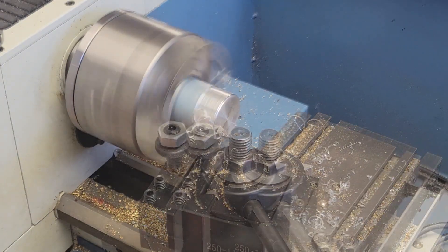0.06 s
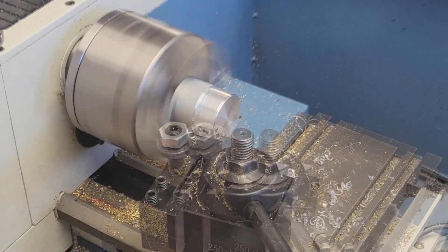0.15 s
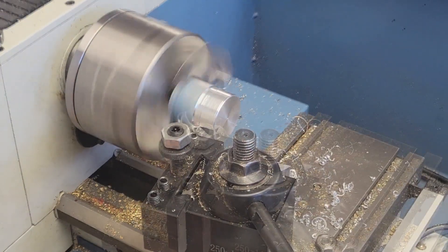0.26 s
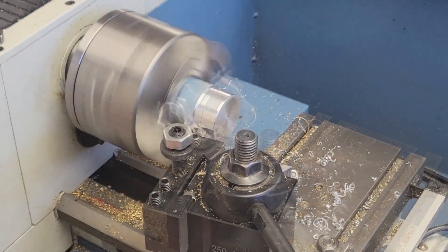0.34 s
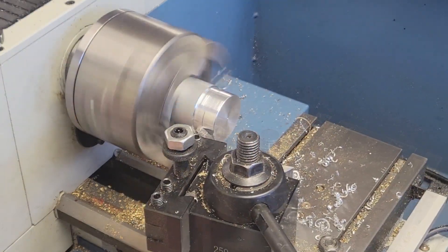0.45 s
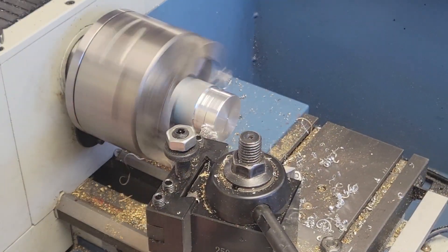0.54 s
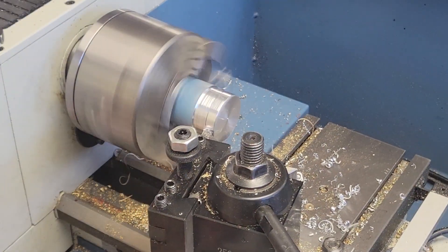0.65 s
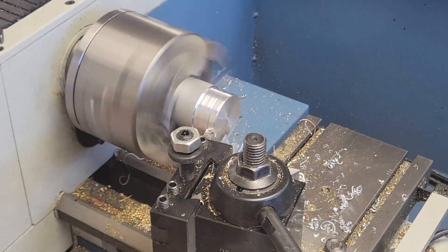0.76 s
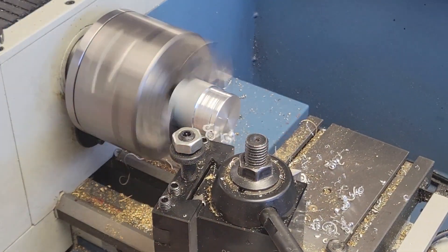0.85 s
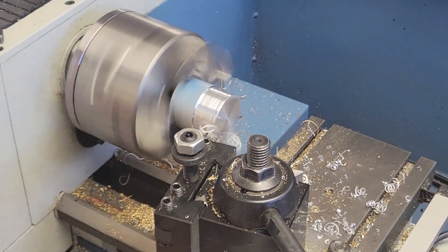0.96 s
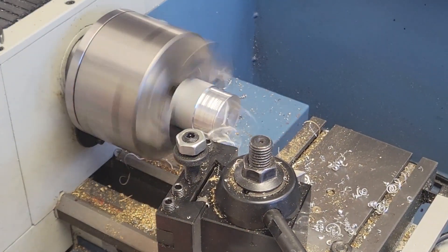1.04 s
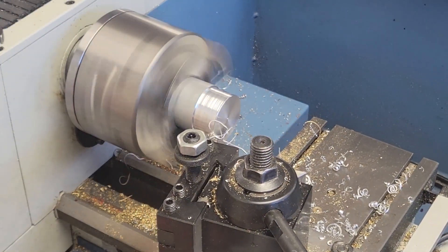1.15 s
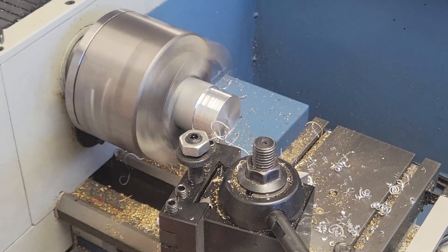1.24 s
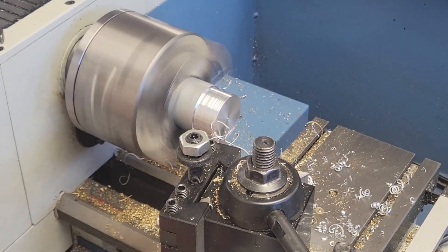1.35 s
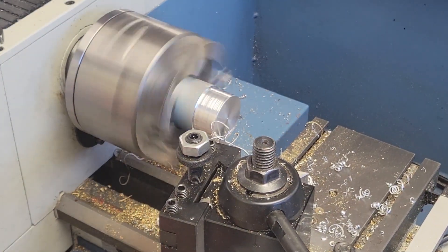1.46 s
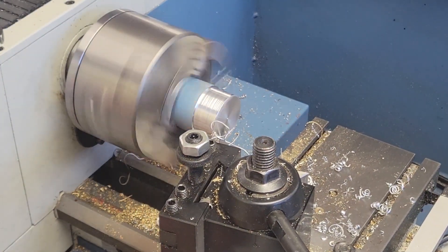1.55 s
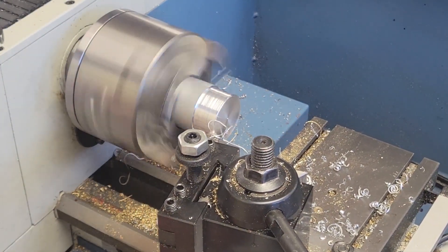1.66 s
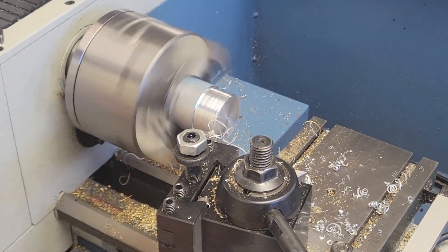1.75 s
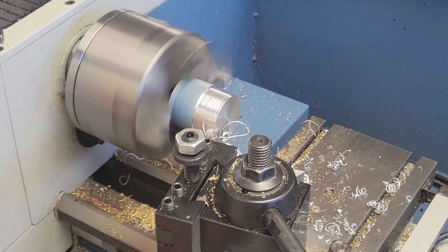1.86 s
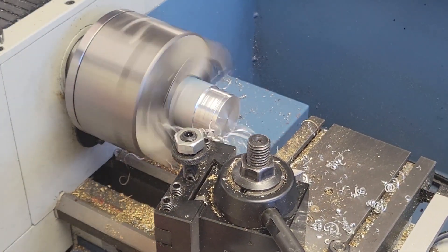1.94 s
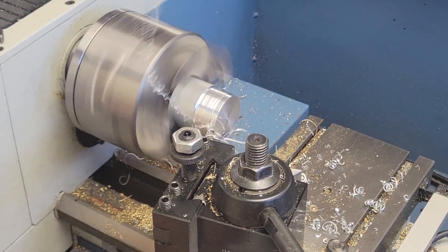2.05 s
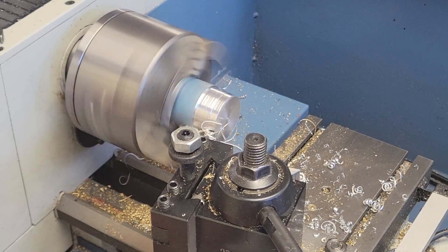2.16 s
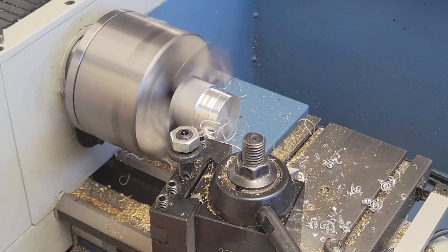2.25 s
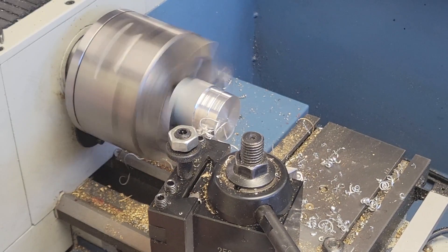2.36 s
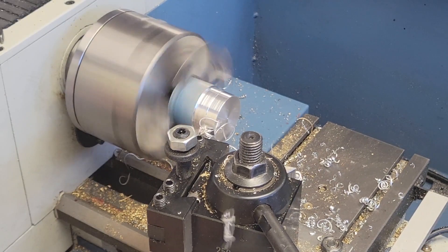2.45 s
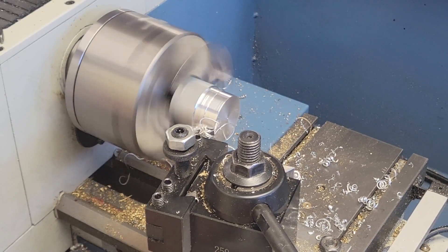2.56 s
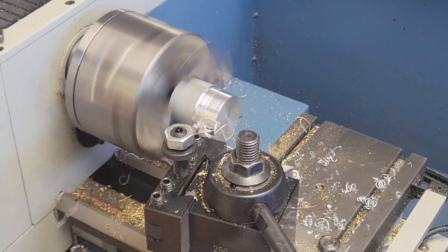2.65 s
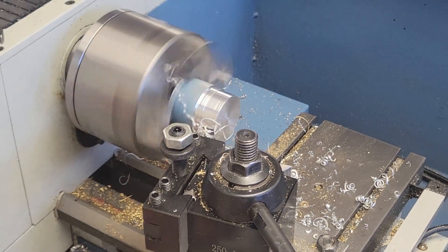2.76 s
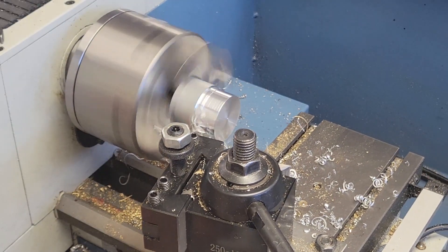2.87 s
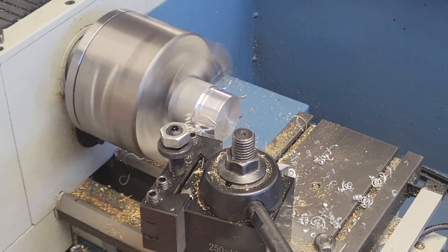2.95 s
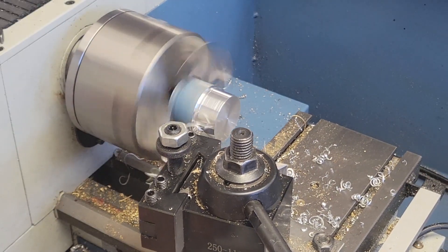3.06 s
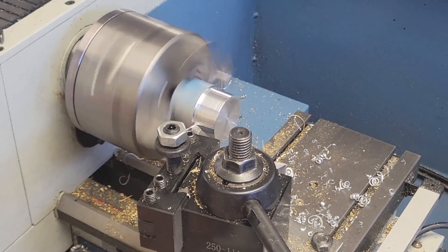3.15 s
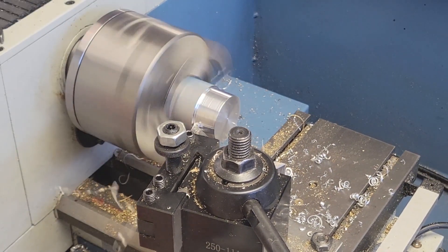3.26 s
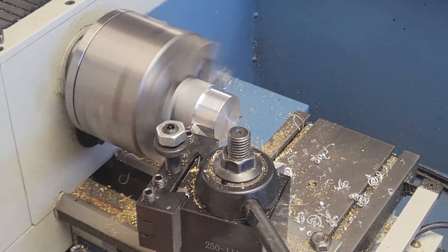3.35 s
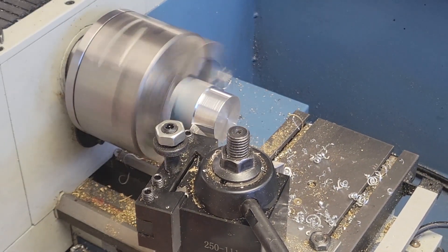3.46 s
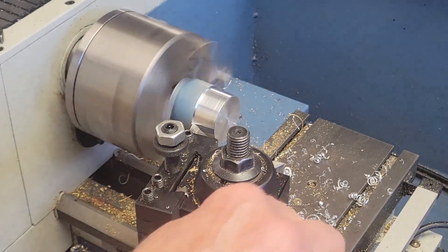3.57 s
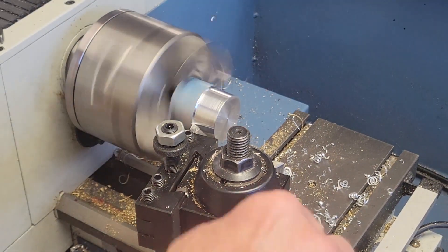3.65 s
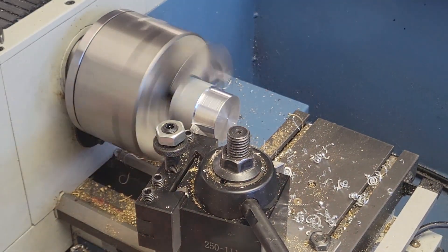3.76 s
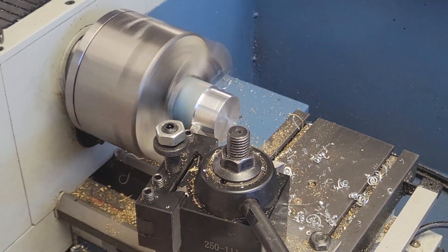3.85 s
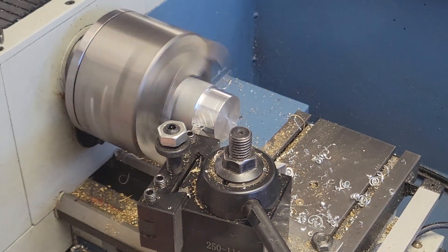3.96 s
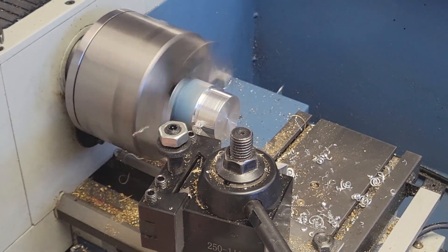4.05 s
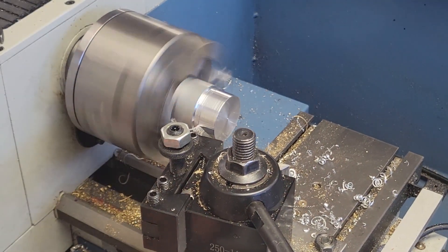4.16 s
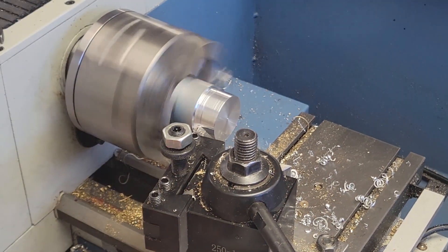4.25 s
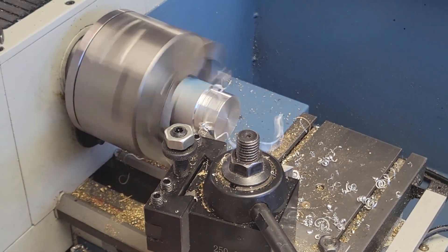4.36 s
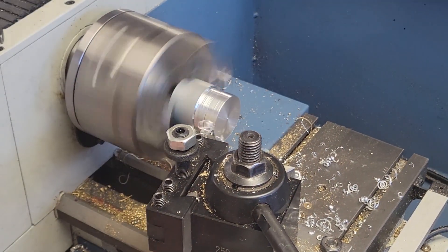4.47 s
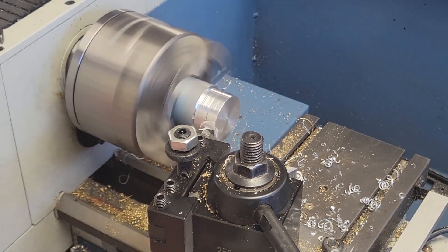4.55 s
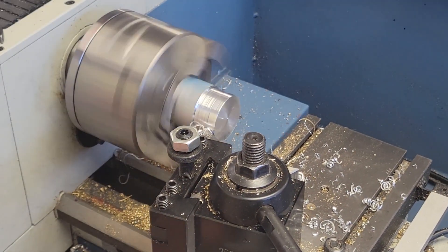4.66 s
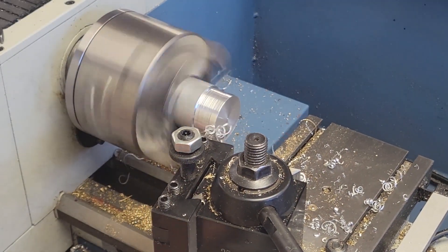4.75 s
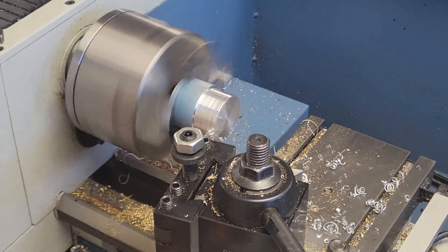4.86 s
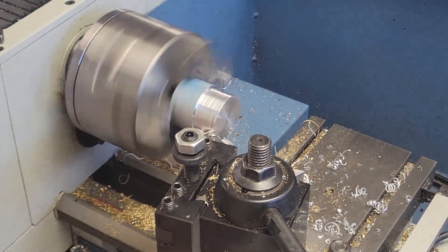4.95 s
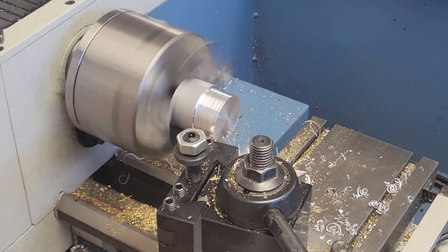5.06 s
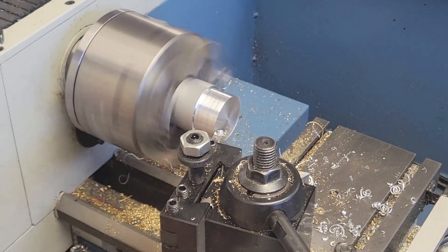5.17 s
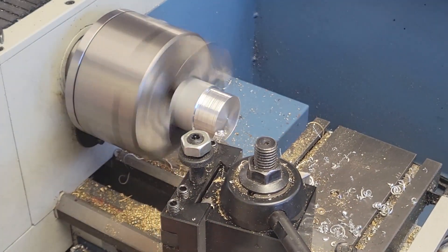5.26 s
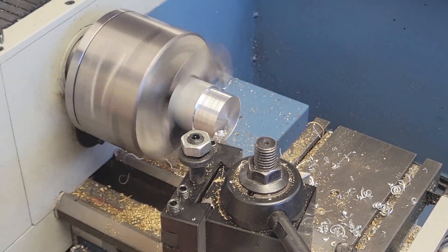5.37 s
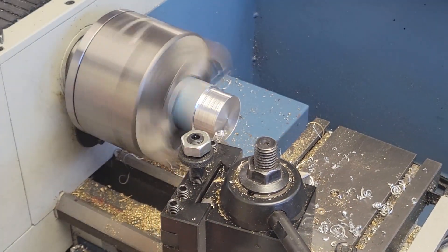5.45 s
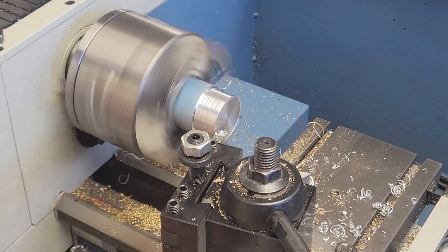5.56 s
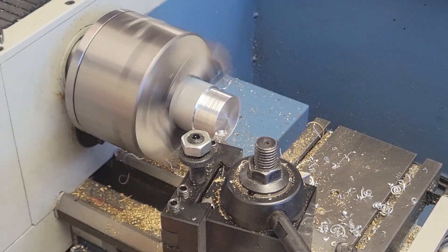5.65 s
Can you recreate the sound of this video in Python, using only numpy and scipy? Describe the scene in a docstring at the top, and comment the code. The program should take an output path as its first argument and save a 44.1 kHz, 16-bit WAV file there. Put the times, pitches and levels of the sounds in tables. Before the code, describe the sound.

A small metal lathe is running in a workshop, its motor giving a high, wavering whine over a gritty bearing whirr. The tool hisses steadily on a spinning aluminium bar. A heavier cut makes the gears growl, knock and clatter, then eases, and curls of metal scrape briefly along the bar. Near the end the motor speeds up and the rattle drops away. The sound is close, with a short room echo.

```python
"""A small metal lathe at work

The lathe turns an aluminium bar in a workshop. Its motor whines, sags under load and races when
the load lets go. Gears growl, rattle and clatter in the headstock, the housing that holds them.
The tool hisses on the slightly off-centre bar, swelling once a turn (hardly at all in the heavy
cut), and curls of cut metal, called swarf, scrape past."""
import sys
import numpy as np
from scipy import signal
from scipy.fft import rfft, irfft, next_fast_len
from scipy.io import wavfile

SR = 44100
rng = np.random.default_rng(int(sys.argv[2]) if len(sys.argv) > 2 else 0)


def wav_record(signal):
    """Record a signal, one row per channel, as 16-bit PCM in the file named by sys.argv[1]."""
    frames = np.transpose(np.atleast_2d(signal))
    bounded = np.clip(frames, -1, 1)
    # unit amplitude maps onto the largest positive 16-bit level
    quanta = np.round(bounded * 32767).astype(np.int16)
    wavfile.write(sys.argv[1], SR, quanta)


N = 251811
TIME = np.arange(N) / SR
FREQS = np.maximum(np.arange(N // 2 + 1) * SR / N, 1)
WHINE_CYCLES = 64  # per motor turn
TIGHT_SPOT = 0.79  # how far through each motor turn the pressure peaks

# notes the headstock rings at; each use scales the widths: f/Hz, base width/Hz, relative level/dB
HEADSTOCK = [(331.5, 37, -19), (375, 34, -22), (470.8, 27.6, -2.5), (597, 49, -11), (636, 115, -14.5),
             (780, 76, -12), (953.6, 37, 3.5), (1064, 153, -5), (1129, 33, -4.5), (1244, 53, -7.5),
             (1382, 36, 1.5), (1450, 170, -0.5), (1533, 37, -5), (1629, 33, 6), (1746, 17, 5),
             (1833, 87, 3), (2002, 180, -1.5)]


def motor_speed(pull_db, coasting_db=-65.5, pulling_db=-58):
    """Turns per second: the speed wobbles quickly while the motor pulls and is smooth while it coasts."""
    # motor speed, heard as the pitch of its whine: t/s, f/Hz
    whine_pitch = [(0.0, 2631), (0.22, 2641), (0.28, 2626), (0.34, 2769), (0.36, 2676), (0.44, 2744),
                   (0.53, 2611), (0.6, 2771), (0.68, 2735), (0.75, 2624), (0.82, 2767), (0.86, 2664),
                   (0.89, 2735), (0.99, 2684), (1.16, 2806), (1.18, 2923), (1.26, 2973), (1.45, 2784),
                   (1.64, 2699), (1.68, 2492), (1.81, 2507), (1.83, 2561), (1.89, 2551), (2.02, 2753),
                   (2.16, 2641), (2.2, 2683), (2.29, 2637), (2.33, 2736), (2.58, 2675), (2.63, 2748),
                   (2.68, 2719), (2.78, 2753), (2.94, 2658), (2.98, 2738), (3.06, 2649), (3.09, 2771),
                   (3.24, 2701), (3.28, 2923), (3.32, 2947), (3.37, 2702), (3.42, 2618), (3.49, 2896),
                   (3.62, 2801), (3.82, 2734), (3.88, 2480), (3.94, 2561), (4.01, 2554), (4.08, 2703),
                   (4.14, 2562), (4.18, 2559), (4.2, 2665), (4.34, 2638), (4.36, 2743), (4.4, 2624),
                   (4.46, 2746), (4.63, 2781), (4.68, 2582), (4.8, 2638), (4.99, 2775), (5.07, 2695),
                   (5.11, 2792), (5.16, 2758), (5.23, 3053), (5.3, 2924), (5.45, 2789), (5.71, 2719)]
    whine_hz, = in_time(whine_pitch)
    pulling = np.clip((pull_db - coasting_db) / (pulling_db - coasting_db), 0, 1)
    wobble = .004 * drift(27.6) * pulling * (1 - .5 * load())
    return whine_hz / WHINE_CYCLES * (1 + wobble)


def whine(turns, pull_db, throb=.11, rasp=.3):
    """The motor's tone: shaken once a turn, and steadier in the heavy cut."""
    loose = 1 - .5 * load()
    phase = 2 * np.pi * WHINE_CYCLES * turns + .4 * loose * drift(70)
    shake = 1 + throb * np.cos(2 * np.pi * turns) + rasp * loose * drift(39)
    return np.sqrt(2) * from_db(pull_db + 1.06 * drift(9.2)) * shake * np.sin(phase)


def overtones(turns, turns_per_s):
    """More motor tones swell as the speed carries them across a resonance; high ones flutter most."""
    # tones and their resonances: cycles per turn, f/Hz, width/Hz, relative level/dB, change under load/dB
    motor_tones = [(11, 460, 70, -78, 0), (32, 1393, 66, -59.5, 1), (32, 1465, 60, -67, 0),
                   (38, 1660, 120, -66, 0), (38, 1790, 70, -63, 0), (42, 1790, 60, -61.5, 4),
                   (45, 1775, 60, -68, 15), (57, 2540, 60, -64, -10), (70, 2950, 100, -69, -10),
                   (79, 3330, 160, -80, 14), (84, 3550, 160, -77, 16), (88, 3730, 150, -70, 10),
                   (90, 3770, 110, -69, 11.5), (96, 3755, 150, -66, 18), (96, 4080, 150, -69, 9),
                   (96, 4300, 200, -62, -6), (96, 4500, 200, -65, 0), (99, 4150, 120, -65, 3),
                   (128, 5400, 200, -68, 2), (128, 5740, 260, -63, -2), (147, 6190, 160, -71, 7),
                   (192, 8200, 560, -66, -3), (208, 8750, 400, -69, -2), (224, 9400, 400, -70, 1)]
    out = 0
    for cycles, hz, width, db, load_db in motor_tones:
        phase = cycles * (2 * np.pi * turns + .003 * drift(70))
        flutter_db = min(cycles / 20, 3) * drift(30)
        level = from_db(db - 2.2 + load_db * load() + flutter_db)
        out += level * nearness(cycles * turns_per_s, hz, width) * np.sin(phase)
    return out


def chirps(turns, turns_per_s, pull_db, damped_above_hz=10600):
    """A tone at four times the whine's pitch squeals in short chirps as it crosses a resonance."""
    # resonances that squeal: f/Hz, width/Hz, relative level/dB
    squeals = [(10200, 760, -7.5), (11020, 110, -13)]
    cycles = 4 * WHINE_CYCLES
    pitch_hz = cycles * turns_per_s
    phase = 2 * np.pi * cycles * turns + .7 * drift(130)
    ring = sum(from_db(db) * nearness(pitch_hz, hz, width) for hz, width, db in squeals)
    damping = .6 * load() * np.clip((pitch_hz - damped_above_hz) / 100, 0, 1)
    flicker = np.clip(.65 + .55 * drift(35), 0, 1.4)
    return np.sqrt(2) * from_db(pull_db) * (1 - damping) * flicker * ring * np.sin(phase)


def chatter(turns, turns_per_s, rise_s=.0012, fade_s=.0044, cycles_per_turn=99):
    """While the motor races it ticks once a turn; the pitch of the ticks falls as it slows."""
    # spells of ticking: t/s, length/s, level/dB
    spells = [(1.215, 0.15, -40.5), (5.224, 0.28, -42)]
    loudness = 0
    for start, length, db in spells:
        since_tick_s = (turns - np.interp(start, TIME, turns)) % 1 / turns_per_s
        ticks = np.minimum(since_tick_s / rise_s, 1) * np.exp(-since_tick_s / fade_s)
        loudness += from_db(db) * np.sqrt(swell(start, length)) * ticks
    pitch_hz = cycles_per_turn * turns_per_s * (1 + .008 * drift(30))
    ring = np.sin(2 * np.pi * np.cumsum(pitch_hz) / SR + .55 * drift(200))
    return loudness * from_db(2.5 * drift(30)) * ring


def gear_mesh(turns, turns_per_s, strain_db, teeth=15):
    """Teeth pressed together in the heavy cut growl at the rate they meet, and at multiples of it."""
    # gear tones and their resonances: multiple of the tooth rate, f/Hz, width/Hz, relative level/dB
    mesh_tones = [(1, 645, 60, -15), (2, 1275, 150, 1), (3, 1930, 170, 1.5)]
    phase = 2 * np.pi * teeth * turns + .22 * drift(110)
    tones = 0
    for multiple, hz, width, db in mesh_tones:
        rough = 1 + .45 / multiple * drift(60)
        ring = nearness(multiple * teeth * turns_per_s, hz, width)
        tones += from_db(db + 2.4 * drift(25)) * rough * ring * np.sin(multiple * phase)
    return np.sqrt(2) * load() * from_db(-61 + .31 * strain_db) * tones


def rattle(turns, strain_db, easy_running_db=-61.5):
    """Loose gear teeth knock and ring the headstock, harder under strain and in three pulses a turn."""
    angle = 2 * np.pi * turns
    pulses = from_db(2.4 * np.cos(angle) + 2 * np.cos(3 * angle))
    force = grains(per_s=1500, spread_db=1.8) * pulses
    level = from_db(easy_running_db + strain_db + .73 * drift(17))
    return level * ring_metal(force, HEADSTOCK, broaden=1.63)


def clatter():
    """Short bursts of hard tooth knocks draw a dull thud and a bright ring from the headstock."""
    # bursts of clatter: t/s, length/s, thud level/dB, ring level/dB
    bursts = [(0.523, 0.043, -54, -56), (1.874, 0.045, -47.5, -58), (1.93, 0.032, -54, -53),
              (2.141, 0.072, -52, -50), (2.207, 0.056, -47, -66), (2.274, 0.055, -47.5, -66),
              (2.582, 0.039, -50.5, -51), (2.66, 0.042, -53.5, -47), (2.79, 0.018, -54, -65),
              (2.912, 0.1, -60, -53), (3.034, 0.051, -50.5, -56), (3.235, 0.023, -58, -53),
              (3.393, 0.078, -60, -48), (3.983, 0.043, -69, -53), (4.129, 0.079, -58, -56),
              (4.353, 0.15, -59.5, -54.5), (4.722, 0.29, -56, -72), (5.027, 0.05, -63, -54),
              (5.345, 0.05, -67.5, -72), (5.517, 0.064, -66, -67)]
    thud = ring_metal(grains(per_s=1700, spread_db=1), HEADSTOCK, broaden=1.37)
    thud = rms_one(cut_off(thud, 350, "low", order=1))
    ring = ring_metal(grains(per_s=3000, spread_db=-2), HEADSTOCK, broaden=2.4)
    ring = rms_one(cut_off(ring, 1600, "high", order=1))
    return sum(swell(start, length) ** .88 * (from_db(thud_db) * thud + from_db(ring_db) * ring)
               for start, length, thud_db, ring_db in bursts)


def knocks(thud_below_hz=750):
    """One tooth strikes hard: all the headstock's notes start at once and die quickly."""
    # single strikes: t/s, relative thud level/dB, relative ring level/dB
    strikes = [(0.517, -64, -51), (0.543, -57.5, -65), (1.456, -74, -57), (1.589, -79, -54),
               (1.865, -58, -46), (1.887, -55, -52), (1.936, -55, -48), (2.124, -59, -45),
               (2.148, -66, -45.5), (2.223, -53.5, -47), (2.282, -51, -46), (2.42, -70, -43),
               (2.465, -63, -42), (2.496, -55, -50), (2.589, -62.5, -49), (2.599, -52, -43),
               (2.695, -71, -44), (2.904, -61, -40), (2.922, -50.5, -44), (3.062, -50.5, -45.5),
               (3.168, -72, -47), (3.243, -57.5, -56), (3.398, -56, -48), (3.413, -62, -50),
               (3.982, -69, -46.5), (3.993, -69, -49), (4.133, -69, -56), (4.15, -70, -48),
               (4.35, -67, -49), (4.391, -59.5, -50), (4.724, -64, -48.5), (4.755, -62, -49),
               (4.778, -65, -49), (5.035, -63, -51)]
    out, age = np.zeros(N + SR), TIME[:SR // 10]
    hz, width, db = np.transpose(HEADSTOCK)[:, :, None]
    low = hz[:, 0] < thud_below_hz
    for start, thud_db, ring_db in strikes:
        at = int(start * SR)
        strength = from_db(db) * np.sqrt(width) * rng.standard_normal(hz.shape)
        notes = strength * np.exp(-np.pi * .9 * width * age) * np.cos(2 * np.pi * hz * age)
        thud, ring = notes[low].sum(0), notes[~low].sum(0)
        for part, level_db in ((thud, thud_db), (ring, ring_db)):
            first_10_ms = part[:SR // 100]
            out[at:at + len(age)] += from_db(level_db - 3.5) * part / np.std(first_10_ms)
    return out[:N]


def cutting(turns, motor_turns_per_bar_turn=8, high_spot=.34):
    """Metal peels off in countless tiny slips, pulsing with each motor turn and the bar's high spot."""
    # strength of the cut: t/s, relative hiss level/dB, relative sizzle level/dB
    cut_levels = [(0.0, -58, -62.5), (0.33, -57.5, -60.5), (0.48, -53.5, -55.5), (1.1, -54, -56),
                  (1.4, -52.5, -58), (1.75, -50, -55), (3.15, -49.5, -55), (3.35, -53.5, -56.5),
                  (3.72, -53, -59.5), (4.03, -53, -55), (5.1, -53.5, -55), (5.3, -53.5, -59),
                  (5.71, -53, -60)]
    # tone colour of the hiss: f/Hz, relative level/dB
    hiss_colour = [(1800, -12), (2300, -20), (2700, -12), (3250, -12), (3600, -3.5), (4700, -3),
                   (5150, -5.5), (5700, -7.5), (6700, -4), (7400, -13.5), (9500, -50.5)]
    # tone colour of the finer sizzle: f/Hz, relative level/dB
    sizzle_colour = [(5000, -35), (7500, -9.5), (8200, -2.5), (9100, -5.5), (9700, -4.5), (10800, -7.5),
                     (11300, -17), (12200, -15), (13100, -10.5), (15000, -11.5), (16000, -8)]
    # pitches that tool, bar and tool holder boost or weaken: f/Hz, width/Hz, boost/dB
    tool_resonances = [(3200, 250, -3), (3770, 100, 7), (4150, 130, 7), (4270, 60, -6), (4370, 55, 6),
                       (4500, 70, 3), (4640, 110, 5), (5000, 100, -6), (5200, 130, -5), (5430, 100, 4),
                       (5900, 70, 3), (6180, 160, 5), (6550, 120, -5), (6750, 100, 4), (7380, 200, -3),
                       (7920, 90, 8.5), (8080, 90, -4), (8350, 160, 6.5), (8950, 130, 6), (9700, 200, -4),
                       (13250, 170, 5), (14200, 120, 9.5), (15080, 140, 7)]
    hiss_db, sizzle_db = in_time(cut_levels)
    angle = 2 * np.pi * (turns - TIGHT_SPOT)
    bar_angle = 2 * np.pi * (turns / motor_turns_per_bar_turn - high_spot)
    off_centre_db = 1.75 * np.cos(bar_angle) + 1.2 * drift(33)
    off_centre_db *= 1 - .82 * load()  # the heavy cut evens out most of this swing
    pressure = from_db(1.55 * np.cos(angle) + np.cos(2 * angle) + off_centre_db)
    ringing_db = sum(db / (1 + (2 * (FREQS - hz) / width) ** 2) for hz, width, db in tool_resonances)
    slips = pressure * grains(per_s=12000, spread_db=3)
    hiss = rms_one(colour(slips, per_hz(hiss_colour) + ringing_db))
    fine_slips = pressure ** .8 * rng.standard_normal(N)
    sizzle = rms_one(colour(fine_slips, per_hz(sizzle_colour) + ringing_db))
    flicker_db = .93 * drift(25)
    return from_db(hiss_db - 1.43) * hiss + from_db(sizzle_db - .73 + flicker_db) * sizzle


def swarf():
    """Curls of metal scrape along the bar in many small catches."""
    # scrapes: t/s, length/s, f/Hz, base width/Hz, level/dB
    scrapes = [(1.637, 0.29, 1430, 120, -52), (3.252, 0.1, 1750, 120, -56.5),
               (3.594, 0.077, 2604, 200, -49), (3.616, 0.074, 2375, 70, -51),
               (3.626, 0.25, 1830, 180, -57.5), (3.752, 0.11, 2120, 540, -49), (3.95, 0.06, 1430, 45, -51),
               (4.132, 0.055, 1490, 110, -51), (3.938, 0.1, 2970, 90, -61), (4.133, 0.078, 2980, 40, -53),
               (4.675, 0.041, 3010, 70, -53.5)]
    out = 0
    for start, length, hz, width, db in scrapes:
        catches = grains(per_s=2500, spread_db=4)
        out += from_db(db) * swell(start, length) ** .67 * rms_one(resonate(catches, hz, 1.3 * width))
    return out


def bearings(turns, throb_db=1.5):
    """The rolling bearings make a gritty whirr that throbs with each motor turn."""
    # loudness of the whirr: t/s, level/dB
    whirr_levels = [(0.0, -56.5), (0.35, -59), (1.1, -57), (1.35, -58.5), (1.7, -55.5), (3.15, -57),
                    (3.35, -56.5), (3.7, -59), (4.1, -55.5), (5.1, -58), (5.71, -59.5)]
    # notes that the bearings set ringing: f/Hz, base width/Hz, relative level/dB
    resonances = [(342.5, 76, -19.5), (497, 37, -10.5), (605, 31, -15.5), (994, 57, -18.5), (1401, 17, 0),
                  (1430, 110, -5), (1647, 69, -5.5), (1772, 89, 0.5), (1968, 163, -5.5), (2330, 51, -7),
                  (2597, 200, 2), (2960, 46, -2.5), (3126, 460, -6.5)]
    level_db, = in_time(whirr_levels)
    throb = from_db(throb_db * np.cos(2 * np.pi * (turns - TIGHT_SPOT)))
    force = grains(per_s=2200, spread_db=3) * throb
    return from_db(level_db) * ring_metal(force, resonances, broaden=1.46)


def opening_tones(fade_s=.42):
    """A few faint, wavering tones die away at the start."""
    # faint tones: f/Hz, starting level/dB
    tones = [(580, -78), (775, -77), (825, -75), (1055, -67), (1605, -68), (1632, -66), (2480, -69),
             (2812, -68)]
    fade = np.clip(1 - TIME / fade_s, 0, 1)
    chord = sum(from_db(db) * np.sin(2 * np.pi * hz * TIME + .7 * drift(25)) for hz, db in tones)
    return np.sqrt(2) * fade * chord


def glides():
    """Faint low tones sink and fade."""
    # sinking tones: t/s, length/s, first f/Hz, last f/Hz, level/dB
    tones = [(3.52, 0.36, 475, 380, -80.5), (4.42, 0.24, 460, 385, -78)]
    out = 0
    for start, length, from_hz, to_hz, db in tones:
        pitch_hz = np.interp(TIME, [start, start + length], [from_hz, to_hz])
        phase = 2 * np.pi * np.cumsum(pitch_hz) / SR + .3 * drift(40)
        out += from_db(db) * np.sqrt(2 * swell(start, length)) * np.sin(phase)
    return out


def rumble(level_db=-83.5):
    """The workshop's faint, wavering low noise."""
    # tone colour of the rumble: f/Hz, relative level/dB
    rumble_colour = [(20, -33), (60, -20), (100, -18), (150, -9), (200, -4.5), (240, -7), (275, -11),
                     (330, 4.5), (500, -18.5)]
    level = from_db(level_db + 1.5 * drift(6))
    return level * rms_one(colour(rng.standard_normal(N), per_hz(rumble_colour)))


def workshop(x, echo_s=.13):
    """Echoes from the lathe's guard and the walls reach left and right differently."""
    # echoes compared with the direct sound: f/Hz, level/dB
    echo_colour = [(60, -13), (110, -21), (200, -14), (380, -16), (700, -10.5), (1290, -25), (2380, -8),
                   (4400, -5.5), (8120, -3), (15000, -0.5)]
    # left side compared with the right: f/Hz, level/dB
    balance = [(60, 1), (110, -5), (200, -1), (380, -1.5), (700, -2.5), (1290, -0.2), (2380, -3),
               (4400, -1.5), (8120, -0.7), (15000, 1)]
    age = TIME[:SR // 3]
    echoes = rng.standard_normal(len(age)) * from_db(-60 * age / echo_s) * (age > .002)
    reflected = signal.fftconvolve(x, echoes / np.linalg.norm(echoes))[:N]
    side = colour(reflected, per_hz(echo_colour))
    lean_db = per_hz(balance) / 2
    return np.array([colour(x + side, lean_db), colour(x - side, -lean_db)])


def load(from_s=1.43, to_s=3.29, bite_s=.061):
    """How firmly the heavy cut presses the gears together, from 0 to 1."""
    return np.clip(np.minimum(TIME - from_s, to_s - TIME) / bite_s, 0, 1)


def grains(per_s, spread_db):
    """Random tiny impacts of uneven size."""
    sizes = from_db(spread_db * np.minimum(rng.exponential(1, N), 4)) * rng.choice([-1, 1], N)
    return rms_one(sizes * (rng.random(N) < per_s / SR))


def ring_metal(force, resonances, broaden):
    """Impacts ring a metal body, reaching each of its notes with a random strength."""
    return rms_one(sum(from_db(db) * resonate(force * rng.standard_normal(N), hz, width * broaden)
                       for hz, width, db in resonances))


def resonate(x, hz, width_hz):
    """A resonance lets through sound near one pitch; it is applied twice to be more selective."""
    r = np.exp(-np.pi * width_hz / SR)
    gain = (1 - r * r) / 2
    section = [gain, 0, -gain, 1, -2 * r * np.cos(2 * np.pi * hz / SR), r * r]
    return signal.sosfilt([section, section], x + 1e-18)


def nearness(hz, centre_hz, width_hz):
    """How strongly a tone sounds near a resonance; 1 right on it."""
    return 1 / np.sqrt(1 + (2 * (hz - centre_hz) / width_hz) ** 4)


def swell(start, length):
    """A loudness curve that rises fast to 1, then fades."""
    progress = np.clip((TIME - start) / length, 0, 1)
    return np.abs(np.sin(np.pi * progress ** .39))


def drift(rate_hz):
    """A smooth random wobble of typical size 1, mostly slower than rate_hz."""
    step = 16  # samples between random values
    size = next_fast_len(N // step + 2)
    hz = np.arange(size // 2 + 1) * SR / step / size
    slow = irfft(rfft(rng.standard_normal(size)) / (1 + (hz / rate_hz) ** 2), size)
    return np.interp(TIME, np.arange(size) * step / SR, rms_one(slow))


def in_time(rows):
    """Join timed rows into one curve for each column after the time."""
    times, *columns = np.transpose(rows)
    return [np.interp(TIME, times, column) for column in columns]


def per_hz(points):
    """Join a few points into a level in dB for every frequency."""
    hz, db = np.transpose(points)
    return np.interp(np.log(FREQS), np.log(hz), db)


def colour(x, gain_db):
    """Turn each frequency up or down."""
    return irfft(rfft(x) * from_db(gain_db), N)


def cut_off(x, hz, keep, order):
    """Keep the "high" or "low" side of hz; a higher order cuts more steeply."""
    return signal.sosfilt(signal.butter(order, hz, keep, fs=SR, output="sos"), x)


def from_db(db):
    """Turn decibels into a multiplier."""
    return 10 ** (np.asarray(db) / 20)


def rms_one(x):
    """Scale a signal to an average power of 1."""
    return x / np.sqrt(np.mean(x ** 2) + 1e-20)


def scene():
    """The motor's turning sets the pace for whine, gears and cut, all heard in the workshop."""
    # loudness of the whine, up when the motor pulls and down when it coasts: t/s, level/dB
    pull = [(0.0, -62.5), (0.33, -58.5), (1.08, -56), (1.19, -58), (1.28, -69), (1.6, -64.5), (1.71, -63),
            (1.77, -56), (1.88, -51.5), (2.1, -54.5), (2.55, -54), (3.05, -56), (3.13, -60), (3.3, -63.5),
            (3.41, -54), (3.5, -65), (3.8, -65), (3.88, -56), (4.47, -55.5), (4.6, -59.5), (4.66, -60.5),
            (4.68, -52.5), (4.82, -55), (4.9, -60), (5.15, -60), (5.26, -68), (5.71, -65)]
    # strain on the gears compared with easy running: t/s, level/dB
    strain = [(0.0, -5.5), (0.25, 0), (1.2, 2.5), (1.245, -10), (1.448, -18), (1.458, 0.5), (2.05, 7),
              (2.35, 11), (2.9, 9.5), (3.2, 4.5), (3.3, -2), (3.55, -12), (3.8, -9.5), (3.88, 0), (4.4, 3),
              (4.58, 0.5), (4.79, 6.5), (4.95, 2), (5.19, 2.5), (5.225, -17), (5.71, -30)]
    pull_db, = in_time(pull)
    strain_db, = in_time(strain)
    turns_per_s = motor_speed(pull_db)
    turns = np.cumsum(turns_per_s) / SR
    tones = whine(turns, pull_db) + overtones(turns, turns_per_s) + chirps(turns, turns_per_s, pull_db)
    motor = tones + chatter(turns, turns_per_s) + bearings(turns)
    faint_tones = opening_tones() + glides()
    growl = gear_mesh(turns, turns_per_s, strain_db)
    impacts = cut_off(rattle(turns, strain_db) + clatter() + knocks(), 270, "high", order=8)
    tool = cut_off(cutting(turns) + swarf(), 1270, "high", order=4)
    return workshop(motor + growl + impacts + tool + faint_tones + rumble())


def record(dry):
    """The highest treble, above 15800 Hz, is cut away steeply."""
    return signal.sosfilt(signal.ellip(12, .1, 80, 15800, fs=SR, output="sos"), dry)


dry = scene()
out = record(dry)
wav_record(out)
```